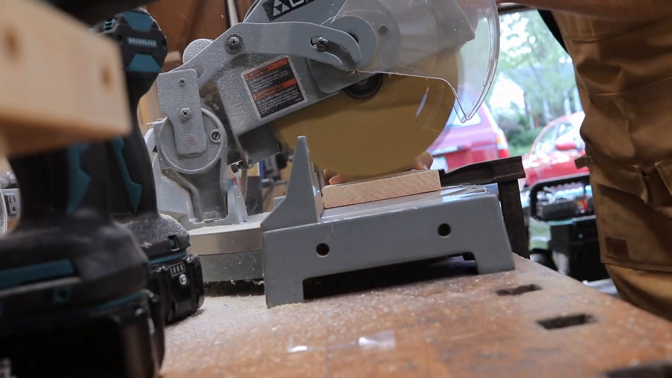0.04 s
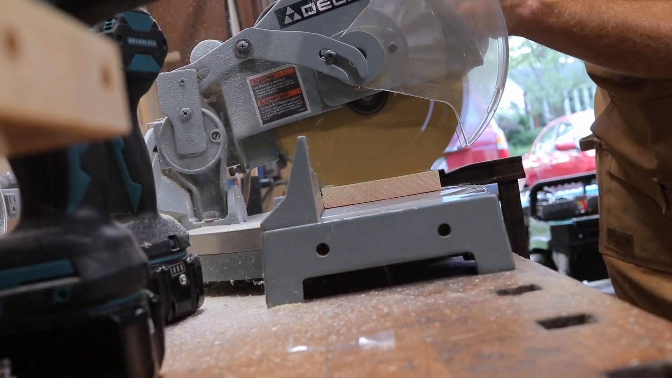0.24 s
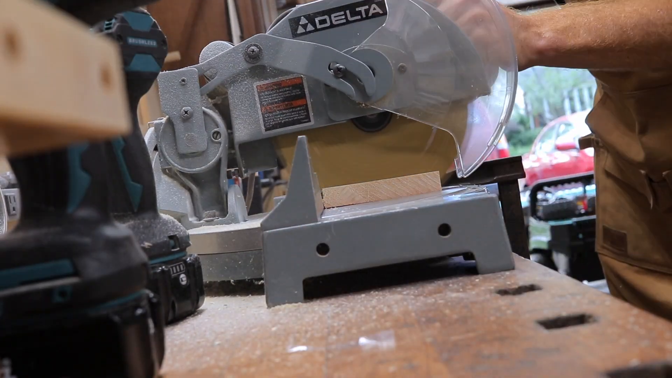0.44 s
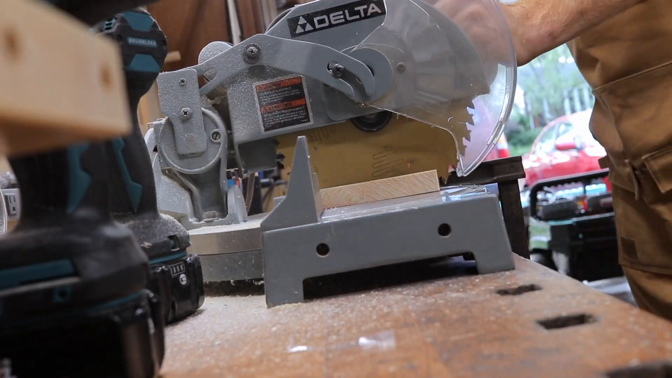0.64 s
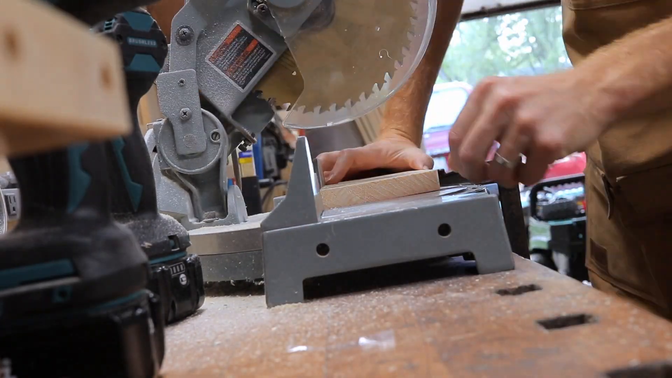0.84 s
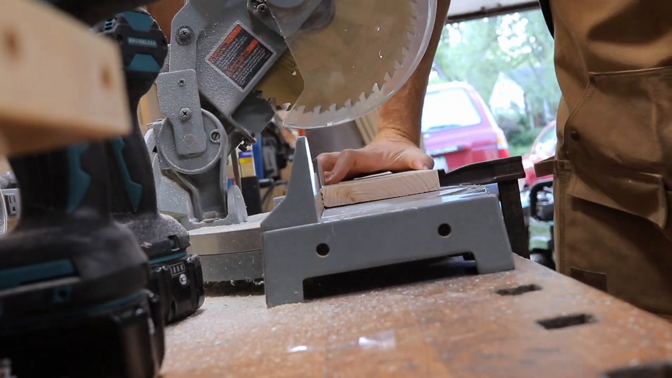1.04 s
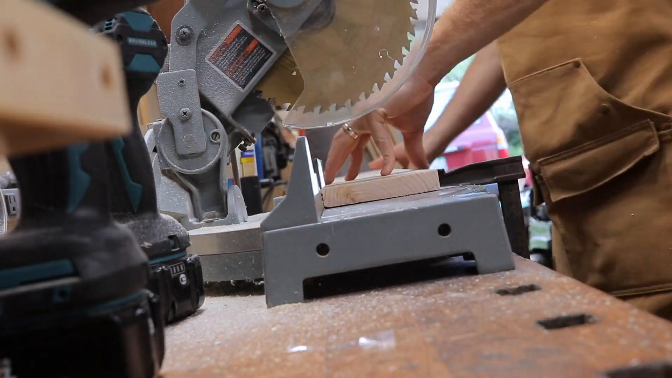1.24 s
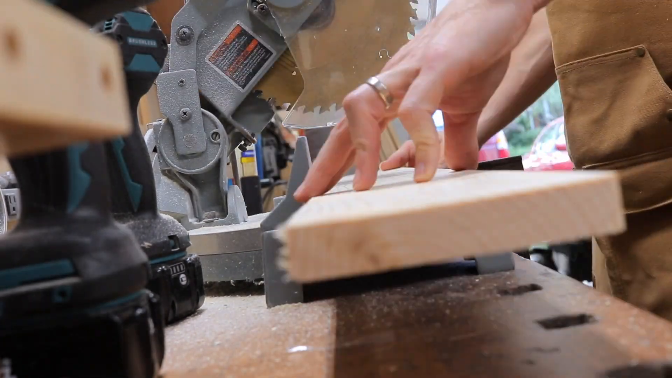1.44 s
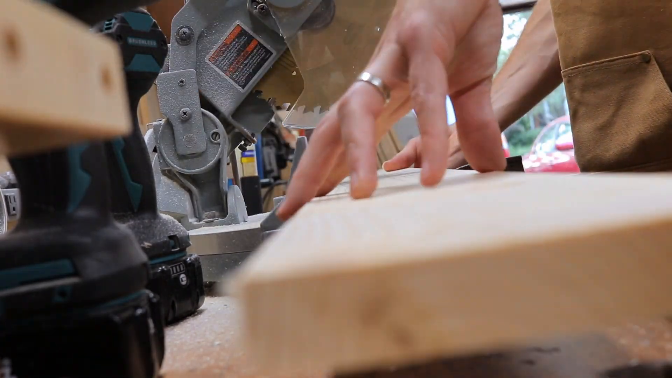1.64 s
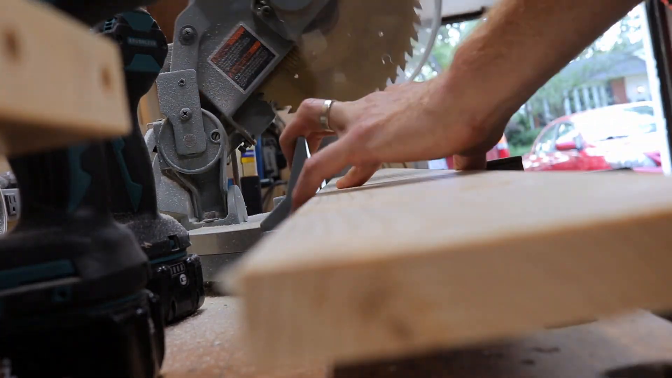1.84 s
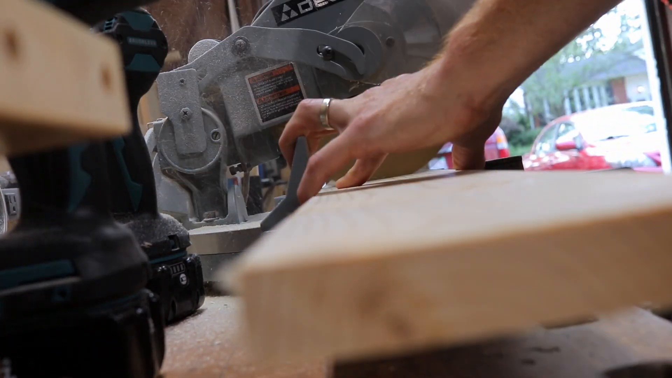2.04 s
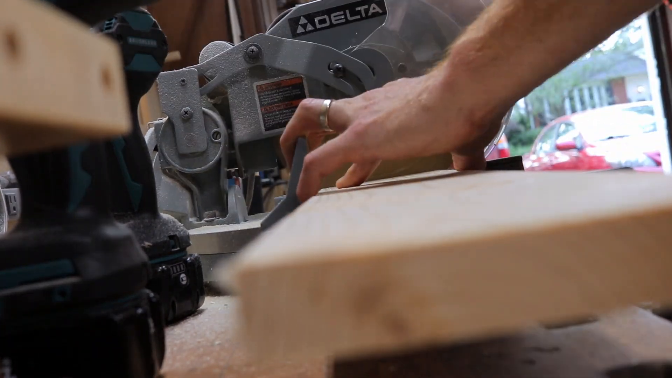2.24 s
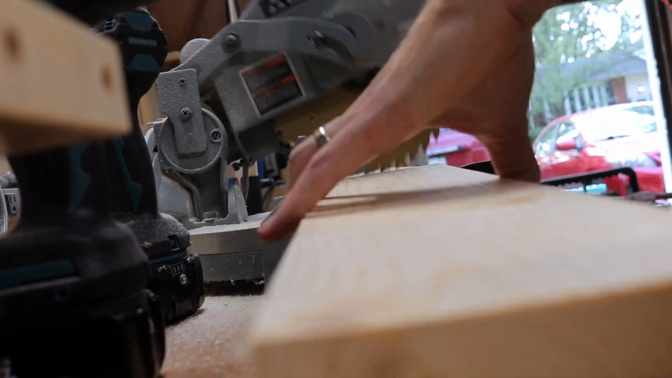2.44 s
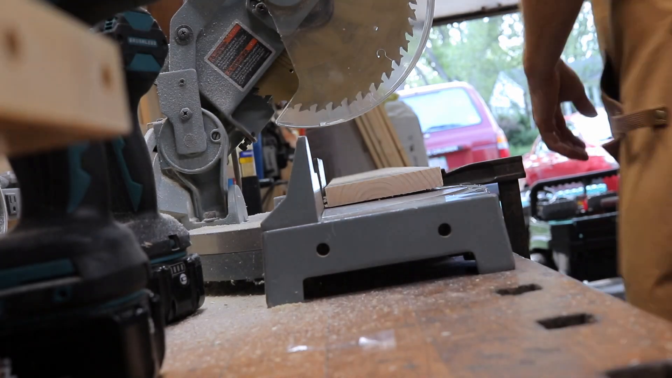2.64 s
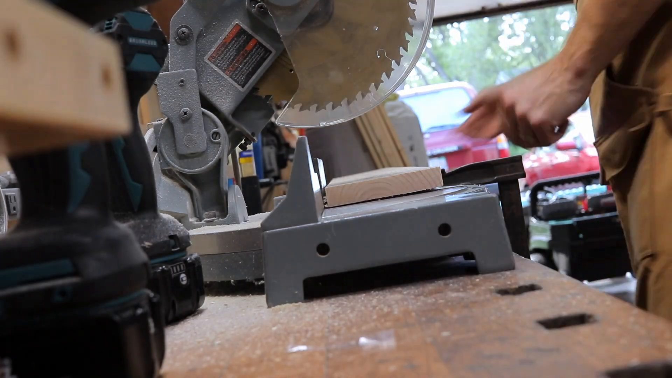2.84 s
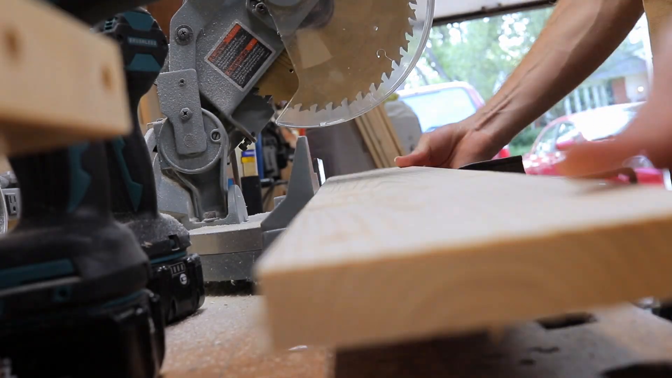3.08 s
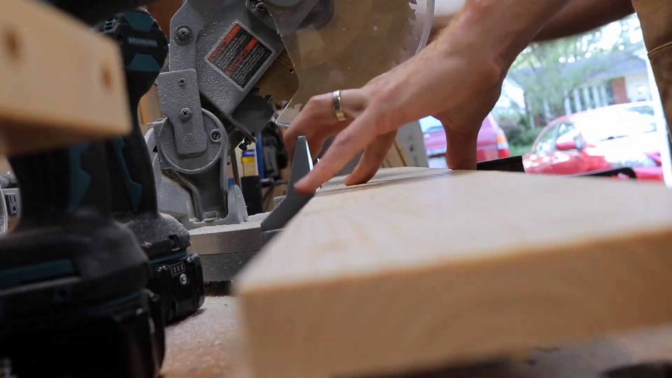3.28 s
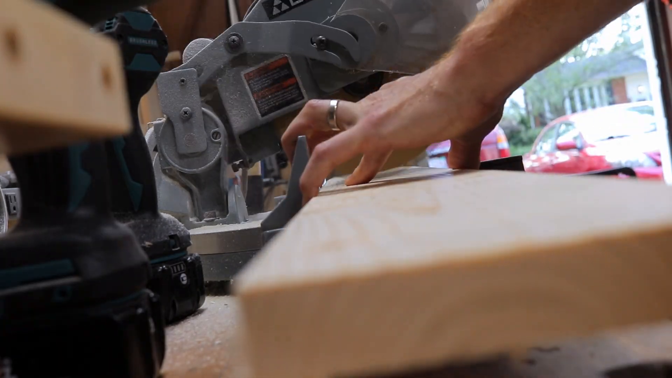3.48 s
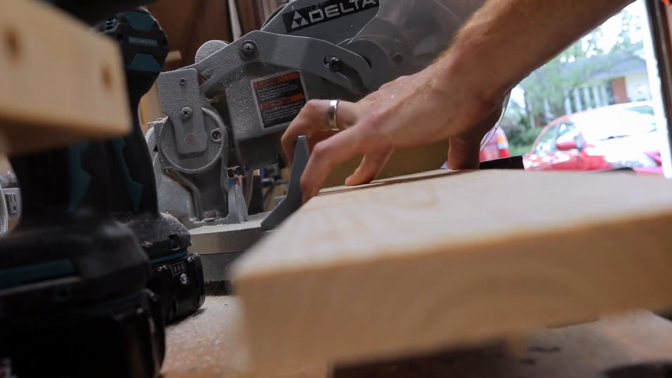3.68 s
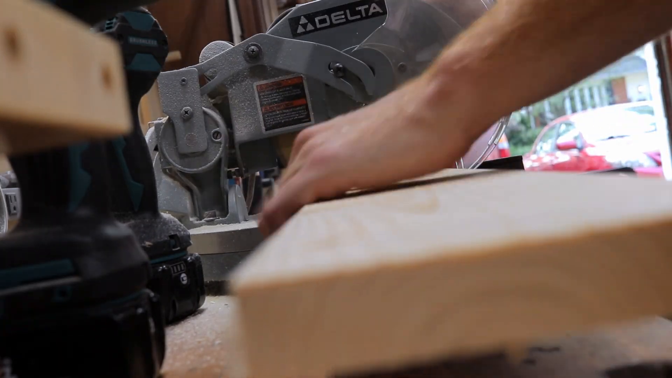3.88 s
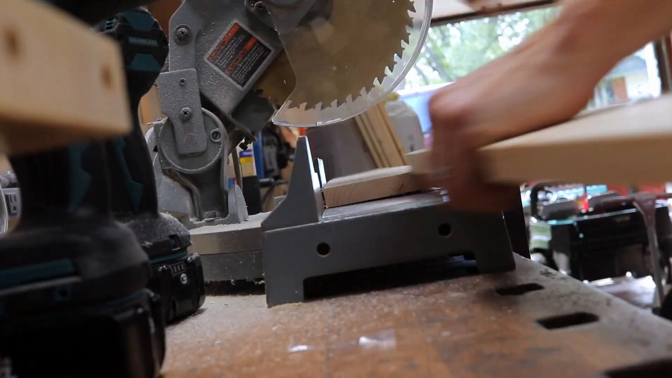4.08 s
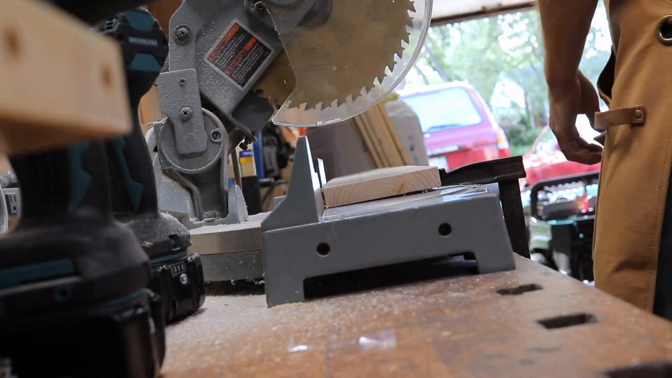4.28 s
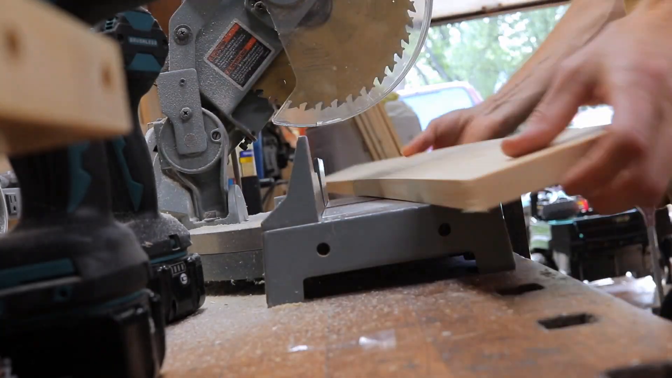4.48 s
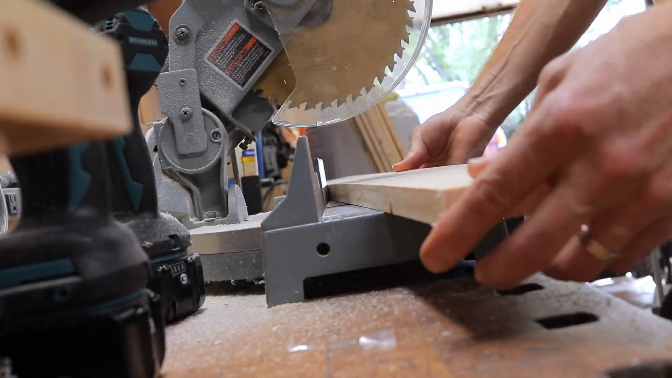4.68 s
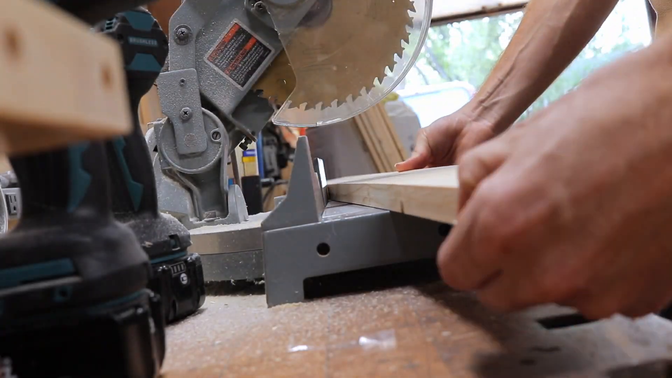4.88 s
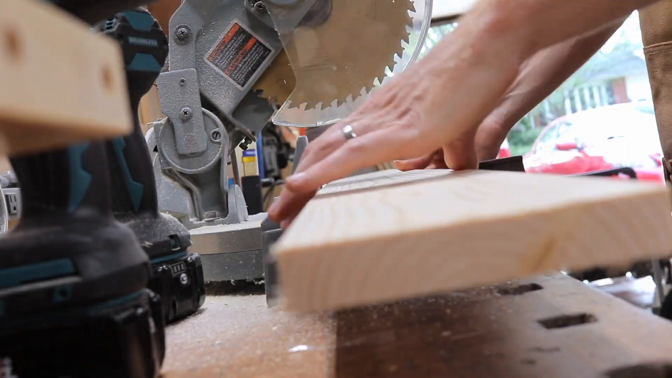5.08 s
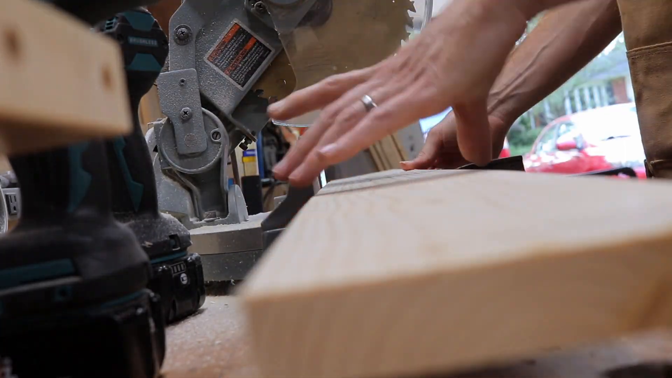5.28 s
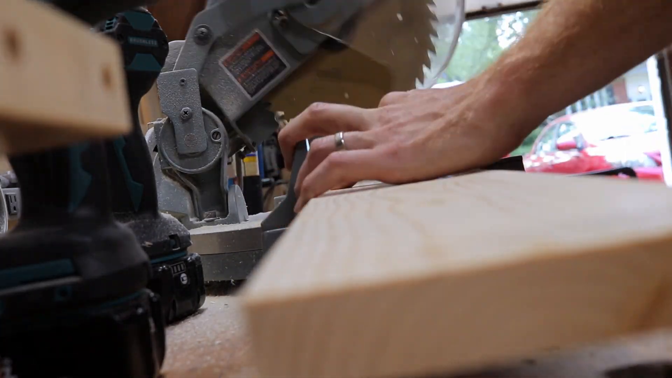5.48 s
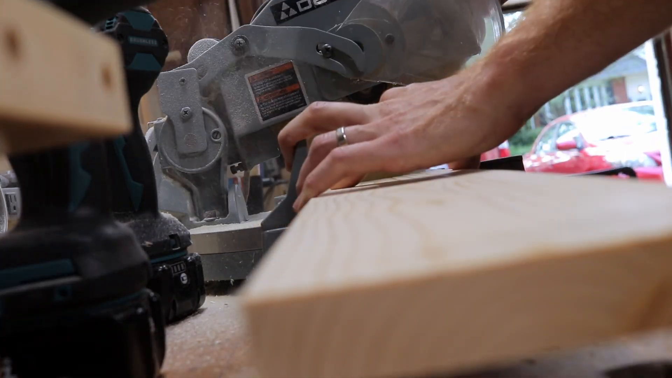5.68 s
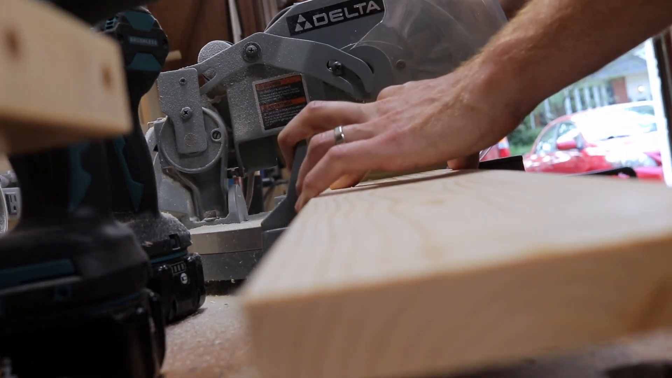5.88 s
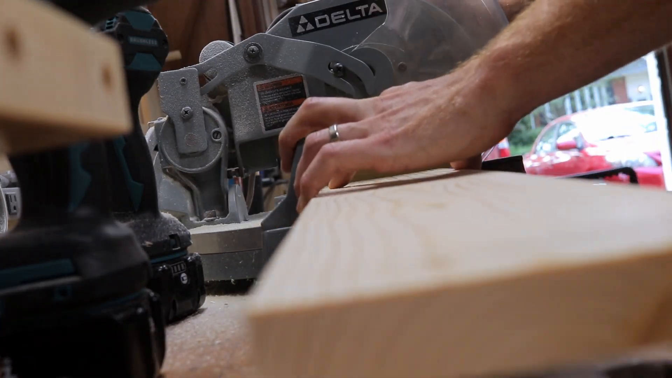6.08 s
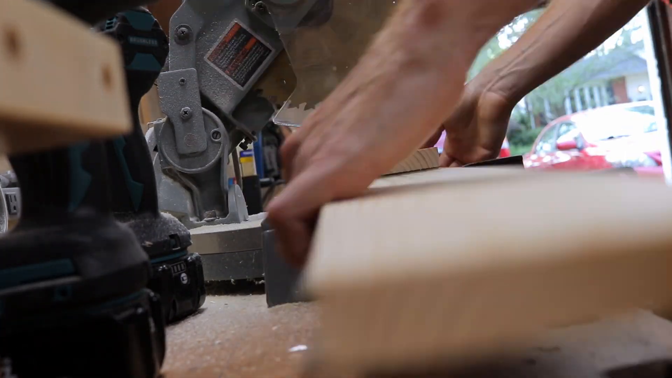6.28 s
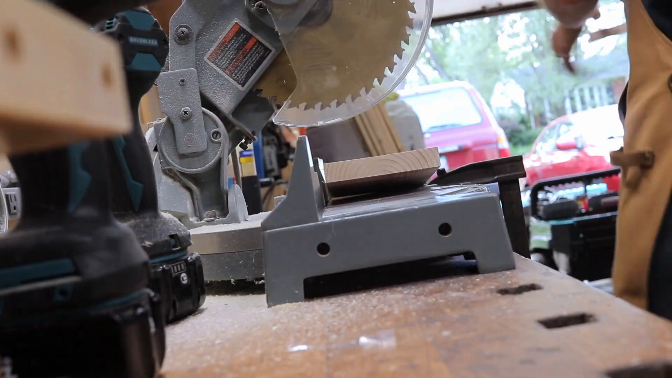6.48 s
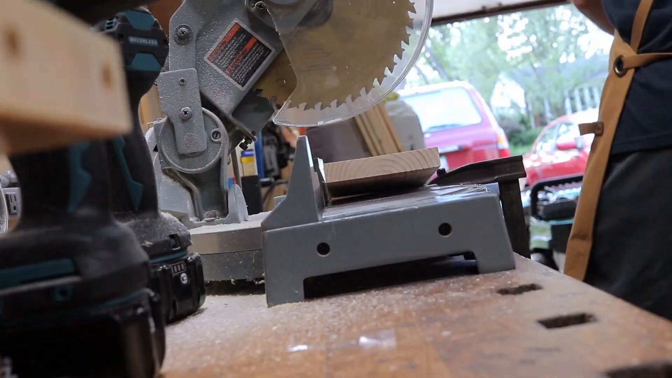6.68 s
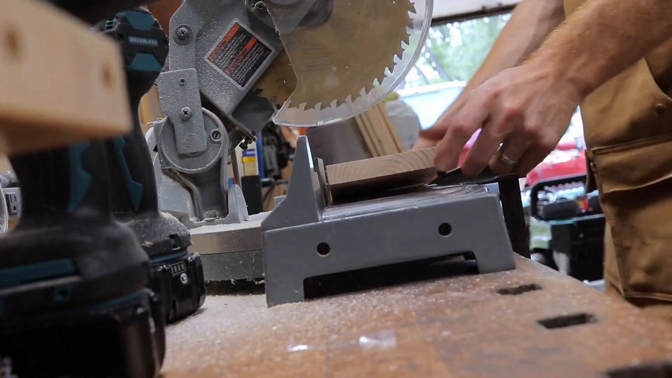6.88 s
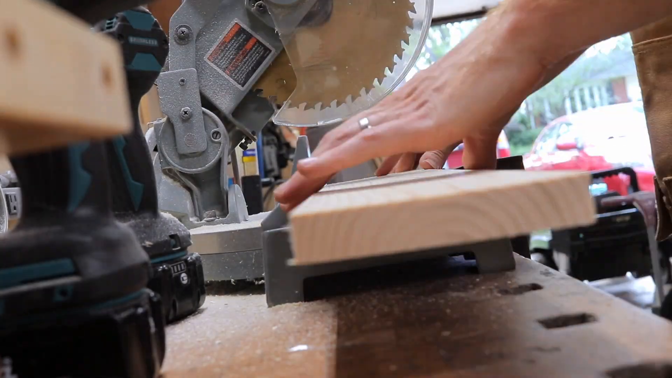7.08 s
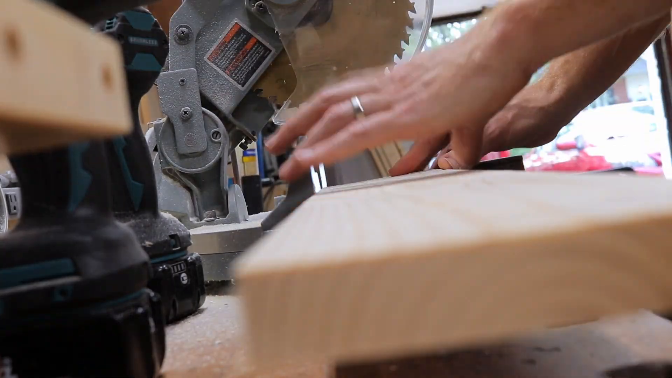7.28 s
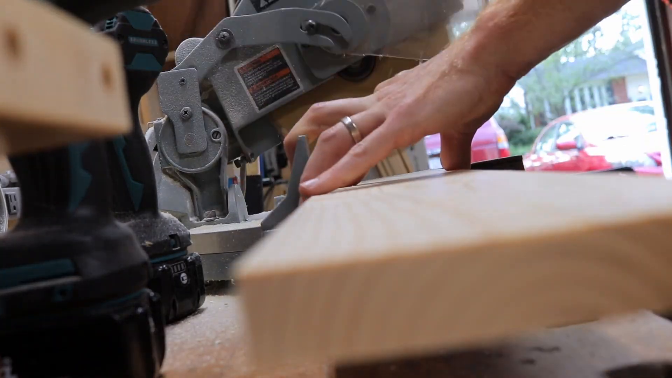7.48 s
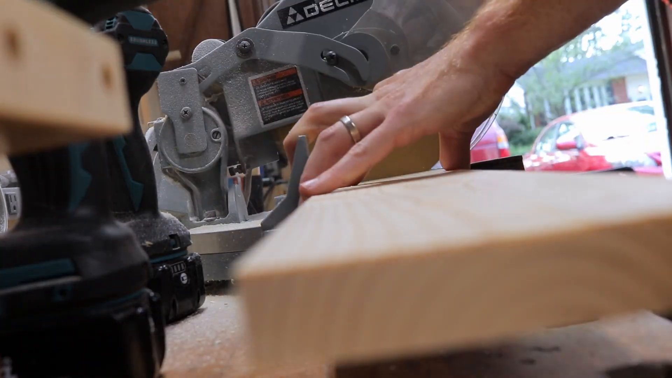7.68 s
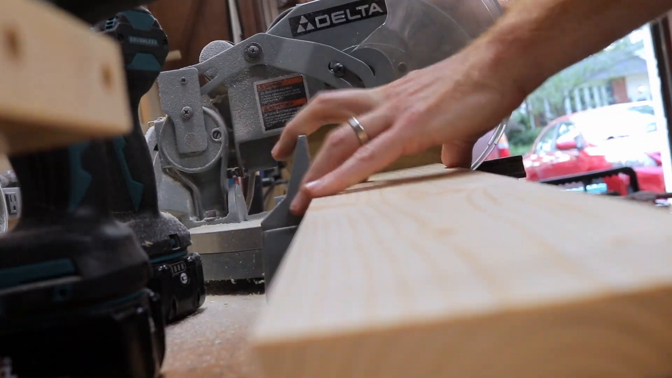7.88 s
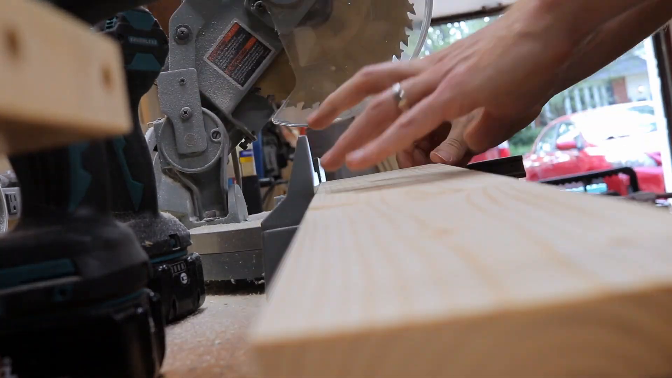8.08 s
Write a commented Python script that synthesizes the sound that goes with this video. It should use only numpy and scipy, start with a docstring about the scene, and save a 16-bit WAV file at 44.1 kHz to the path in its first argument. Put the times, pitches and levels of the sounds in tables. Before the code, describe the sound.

Close, harsh miter saw bursts: five times the motor kicks, the blade screams and sags through wood, then brakes abruptly, wooden boards shuffled in the gaps.

```python
"""Five cuts on a miter saw

In a workshop, close to one microphone, a miter saw makes five quick cuts over quiet air and mains hum.
Each cut is a jolt of noise through frame resonances, then sine partials of the teeth and geared motor that sag
in the wood, over five coloured noises stepped through the stages of the cut until the brake stops the blade.
Low sine thuds and sinking moans join in, and softly knocked boards are short noise bursts between the cuts."""
import sys
import numpy as np
from scipy import signal
from scipy.fft import rfft, irfft
from scipy.io import wavfile
from scipy.ndimage import uniform_filter1d

SR = 44100
rng = np.random.default_rng(int(sys.argv[2]) if len(sys.argv) > 2 else 0)


def generate_wav(sig):
    """Save sig (samples, or channels by samples) to the path in sys.argv[1] as 16-bit PCM at SR."""
    pcm = np.round(np.clip(np.atleast_2d(sig).T, -1, 1) * 32767).astype(np.int16)
    wavfile.write(sys.argv[1], SR, pcm)


N = 358532
T = np.arange(N) / SR


def gain_of(db):
    """Amplitude gain of a level in dB."""
    return 10 ** (np.asarray(db) / 20)


def evened(x):
    """Scales a signal to an RMS of one."""
    return x / np.sqrt(np.mean(x ** 2) + 1e-20)


def read(points, hz):
    """Reads a spectrum in dB along log frequency, 30 dB lower beyond its ends."""
    f, value = np.transpose(points)
    return np.interp(np.log(hz + 1), np.log(f + 1), value, value[0] - 30, value[-1] - 30)


def humps(modes, hz, order=1):
    """Power gain of resonances given as (freq_hz, width_hz, level_db)."""
    return sum(gain_of(2 * db) / (1 + (2 * (hz - f) / width) ** 2) ** order for f, width, db in modes)


def noise(power_of, patchy_db, flicker_db, length=N):
    """Coloured noise in drifting patches, with a flicker that all bands share."""
    frames = length // 128 + 5
    real, imag, patch = rng.standard_normal((frames, 257, 3)).T
    patch = uniform_filter1d(patch, size=5, axis=0)  # across bands
    patch = evened(uniform_filter1d(patch, size=12, axis=1))  # across time
    flicker = evened(uniform_filter1d(rng.standard_normal(frames), size=3))
    bands = (real + 1j * imag) * gain_of(patchy_db * patch + flicker_db * flicker)
    white = signal.istft(bands, nperseg=512, noverlap=384)[1][:length]
    colour = np.sqrt(power_of(np.fft.rfftfreq(length, 1 / SR)))
    return evened(irfft(rfft(white) * colour, length))


def burst(modes, order):
    """A tenth of a second of noise in resonances, levelled on its first moments."""
    def power_of(hz):
        return humps(modes, hz, order) / (1 + (150 / (hz + 1)) ** 6)  # little below 150 Hz
    x = noise(power_of, 0., 0., length=4096)
    return x / np.sqrt(np.mean(x[:1200] ** 2))


def moments(cut):
    """Times of switch on, bite, hardest push, last wood, blade exit, switch off and rest."""
    return cut[0] + np.array([0, *cut[1:7]])


def add(mix, start_s, sound):
    """Lays a sound into the mix at its start time."""
    part = mix[max(round(start_s * SR), 0):][:len(sound)]
    part += sound[:len(part)]


# colour of the air in the shop: freq_hz, density_db
SHOP_AIR = [(15, -52.5), (25, -1), (117, -5.5), (180, -10), (242, -5.5), (623, -12.5), (862, -11.5),
            (961, -5.5), (1070, -15), (1440, -14.5), (2220, -23), (4360, -26), (7490, -37.5), (12200, -50),
            (16000, -56)]
AIR_DB, HUM_DB, HUM_HZ = -61.5, -69.5, 123


def shop():
    """Quiet air of the shop as patchy noise, and a wavering mains hum as two narrow noise bands."""
    air = noise(lambda hz: gain_of(2 * read(SHOP_AIR, hz)), patchy_db=2., flicker_db=.6)
    hum_modes = [(HUM_HZ, 12, 0), (2 * HUM_HZ, 15, -6)]
    hum = noise(lambda hz: humps(hum_modes, hz, order=2), 0., 0.)
    return gain_of(AIR_DB) * air + gain_of(HUM_DB) * hum


# starting jolts of the saw: peak_s, level_db, rise_s, t60_s
JOLTS = [(.007, -14.5, 0.0063, 0.043), (1.92, -12, 0.018, 0.021), (3.433, -13.5, 0.015, 0.043),
         (5.548, -11.5, 0.0024, 0.03), (7.496, -15.5, 0.016, 0.027)]
# resonances of the saw frame: freq_hz, width_hz, level_db
FRAME_MODES = [(245, 60, -13), (710, 70, 0), (860, 70, -2), (1380, 150, -8), (1620, 130, -6),
               (2320, 300, -17), (3250, 500, -17), (4300, 300, -17), (5500, 900, -22), (9000, 4000, -32)]


def jolt(peak_s, level_db, rise_s, t60_s):
    """The motor kicks the frame: a short rattle through its resonances."""
    t = np.arange(4096) / SR - rise_s
    swell_db = 40 * np.minimum(t / rise_s, 0)
    fade_db = -60 * np.maximum(t - .015, 0) / t60_s  # holds for 15 ms first
    return peak_s - rise_s, gain_of(level_db + swell_db + fade_db) * burst(FRAME_MODES, order=1)


# one row a cut. Switch on: start_s; seconds after it: bite_s, push_s (hardest), clear_s (teeth leave the
# wood), exit_s (blade), off_s (switch), rest_s (blade still); before the shares and level curves:
# push_db, labour_db (frame), rasp_db (exit), song_db (teeth), whine_db (motor)
CUTS = [(.003, .102, .325, .407, .473, .495, 1.167, 1.5, 2.5, 8, -3, -1.5),
        (1.93, .095, .235, .275, .35, .372, 1.06, -1, -.4, 2, -4, .4),
        (3.445, .097, .26, .305, .385, .42, 1.105, 1.5, .4, 3, -.6, 1.2),
        (5.57, .09, .27, .295, .445, .478, 1.16, -.5, -.6, 2.2, 1.5, .4),
        (7.51, .094, .23, .298, .352, .39, 1.1, 2.5, -1.2, 8, 2.5, .4)]
# colours of the noises, under power or throughout: freq_hz, density_db
RUMBLE = [(25, -14), (45, -11), (65, -2.5), (90, -6), (118, 6.5), (160, -6.5), (220, -2.5), (290, -31.5)]
DRONE = [(100, -52.5), (170, -23), (204, -27), (248, -16.5), (381, -13.5), (695, 1.5), (842, -1),
         (927, -9.5), (1000, -6), (1090, -7.5), (1150, -14), (1500, -27), (2530, -120)]
ROAR = [(590, -27.5), (1000, 1.5), (1080, -13), (1260, 3.5), (1370, -3.5), (1790, 0.5), (2200, -7.5),
        (2860, -29), (4840, -120)]  # of the guard
GRIND = [(1120, -11), (1900, -10.5), (1940, -9.5), (3210, -2.5), (3480, -5), (4130, -5.5), (4480, -6),
         (5690, -12), (6400, -19.5), (8320, -35), (14100, -120)]
HISS = [(3060, -36), (5200, -3.5), (5930, -9.5), (6160, -8), (6700, -10), (7500, -8.5), (10600, -14),
        (11800, -18.5), (12700, -19.5), (15200, -24), (16000, -14)]
# colours once the power is cut: freq_hz, density_db
BRAKED_DRONE = [(100, -49.5), (170, -13), (493, -2), (583, 3), (678, 4.5), (777, -8), (890, -10),
                (1100, -3.5), (1150, -10), (1500, -48), (2530, -120)]
BRAKED_GRIND = [(1150, -39), (1900, -5), (2060, -6.5), (2600, -6), (3130, -6.5), (3440, -9.5), (3800, -3),
                (5300, -5.5), (5550, -17.5), (6500, -23), (8000, -53)]
# resonances of guard and gearbox, heard under the brake: freq_hz, width_hz, level_db
GUARD_MODES = [(1209, 37, -2.5), (1280.4, 48, 0), (1686, 74, -7.5), (1811, 51, -0.5), (1960, 35, -7.5)]
GEARBOX_MODES = [(2120, 79, -6), (2410, 12, 8.5), (2263, 18, -2.5), (2690, 65, -4.5), (3218, 58, 6),
                 (3700, 20, 5.5), (4210, 200, -2.5), (4720, 37, -7.5), (4820, 34, 4), (5720, 220, 2)]
# level of each noise, level_db at: kick, run-up, bite, push, last wood, clear, switch off, brake on,
# brake biting, rest, and three steps of dying away
RUMBLE_DB = [-45.5, -38, -51.5, -44, -46.5, -49, -55.5, -63, -64.5, -68.5, -58, -80, -71]
DRONE_DB = [-17.5, -27.5, -26, -24, -26.5, -23.5, -27, -33.5, -34, -33, -42.5, -62.5, -78]
GUARD_DB = [-34.5, -40, -35, -25, -30, -29, -28, -27.5, -25.5, -25, -47, -62.5, -72]
GRIND_DB = [-18.5, -24.5, -23.5, -22.5, -21, -20, -23, -25, -25.5, -26.5, -44.5, -60, -75.5]
HISS_DB = [-37, -37.5, -28, -24.5, -24.5, -28, -31, -36, -35.5, -36.5, -55, -68.5, -88]
# one value a noise, in the order above: settle_s under the brake, then the share of each dB change it follows
BRAKE_S = [.06, .12, 0.15, 0.032, 0.029]
PUSH_SHARE = [0.89, 0.52, 0.51, .6, 0.71]
LABOUR_SHARE = [0.73, 0.59, 0.7, 0.18, .1]
RASP_SHARE = [0.101, 0.199, .3, .6, 1.1]
# steps of dying away: after_rest_s
DYING_S = [.075, 0.17, .28]
RUN_UP_S, CLEAR_S, BITING_S = 0.0085, 0.015, 0.35  # after switch on; after last wood; after switch off
RASP_S = .013  # half length of the rasp
BUZZ_DB = -50  # the mains shaking the powered windings


def tint(points, modes=(), base=1):
    """Patchy noise of one colour, with resonances on top."""
    def power_of(hz):
        return gain_of(2 * read(points, hz)) * (base + humps(modes, hz))
    return noise(power_of, patchy_db=1.5, flicker_db=0.04)


def guard_ring():
    """The guard ringing under the brake: its resonances, falling 3.9 dB an octave away from 1500 Hz."""
    def power_of(hz):
        octaves = abs(np.log2((hz + 1) / 1500))
        return humps(GUARD_MODES, hz) * gain_of(-2 * 3.9 * octaves)
    return noise(power_of, patchy_db=0.21, flicker_db=0.35)


def duller(x, above_hz, db, slack):
    """Lowers the upper part while the brake is slack; it comes up again as the brake bites harder."""
    highpass = signal.butter(4, above_hz, "high", fs=SR, output="sos")
    upper = signal.sosfiltfilt(highpass, x)
    return x - (1 - gain_of(db * slack)) * upper


def machine():
    """Five noises of the running saw step through each cut; three change colour once the power is cut."""
    powered, slack = np.zeros((2, N))
    for cut in CUTS:
        start, *_, off, _ = moments(cut)
        powered += np.interp(T, [start - .08, start - .03, off, off + 0.086], [0, 1, 1, 0])
        slack += np.interp(T, off + np.array([-.1, 0, 0.19, 0.33]), [0, 1, 1, 0])
    driven, braked = np.sqrt(powered), np.sqrt(1 - powered)  # crossfade of equal power

    slow_guard = duller(guard_ring(), 1400, -1.5, slack)
    slow_grind = duller(tint(BRAKED_GRIND, GEARBOX_MODES, base=0.6), 4000, -8.0, slack)
    layers = [tint(RUMBLE),
              driven * tint(DRONE) + braked * tint(BRAKED_DRONE),
              driven * tint(ROAR) + braked * slow_guard,
              driven * tint(GRIND) + braked * slow_grind,
              tint(HISS)]
    winding_modes = [(122, 5.5, -2), (246, 10, 1.5)]
    buzz = gain_of(BUZZ_DB) * powered * noise(lambda hz: humps(winding_modes, hz, order=2), 0., 0.)

    out = np.zeros(N)
    for cut in CUTS:
        start, bite, push, clear, leave, off, rest = moments(cut)
        push_db, labour_db, rasp_db = cut[7:10]
        fade_in = np.clip((T - start) / .014 + 1, 0, 1) ** 2
        fade_out = np.clip((rest + DYING_S[-1] - T) / .05 + 1, 0, 1)
        gate = fade_in * fade_out
        pushed_db = push_db * np.interp(T, [bite, push, clear, clear + CLEAR_S], [0, 1, 1, 0])
        laboured_db = labour_db * np.interp(T, [start, bite, off, off + BITING_S], [0, 1, 1, 0])
        rasped_db = rasp_db * np.exp(-((T - leave) / RASP_S) ** 2 / 2)
        out += gate * buzz
        for k, stages_db in enumerate((RUMBLE_DB, DRONE_DB, GUARD_DB, GRIND_DB, HISS_DB)):
            stages_s = [start, start + RUN_UP_S, bite, push, clear, clear + CLEAR_S,
                        off, off + BRAKE_S[k], off + BITING_S, rest, *(rest + np.array(DYING_S))]
            level_db = np.interp(T, stages_s, stages_db)
            level_db += PUSH_SHARE[k] * pushed_db
            level_db += LABOUR_SHARE[k] * laboured_db
            level_db += RASP_SHARE[k] * rasped_db
            out += gate * gain_of(level_db) * layers[k]
    return out


# one list a powered spin, up to speed, sagging in the wood, free again: time_s, tooth_rate_hz
SPINS = [
    [(.035, 2350), (.105, 2880), (.224, 2620), (.325, 2010), (.361, 2120), (.453, 2780), (.5, 2900)],
    [(1.95, 2500), (2.025, 2880), (2.093, 2510), (2.165, 2330), (2.201, 2430), (2.245, 2740), (2.31, 2910)],
    [(3.46, 2450), (3.542, 2860), (3.624, 2350), (3.664, 2170), (3.705, 2120), (3.8, 2700), (3.87, 2860)],
    [(5.58, 2400), (5.62, 2650), (5.66, 2820), (5.8, 2460), (5.85, 2400), (5.956, 2800), (6.05, 3020)],
    [(7.53, 2450), (7.604, 2860), (7.678, 2470), (7.71, 2340), (7.74, 2305), (7.788, 2420), (7.861, 2810),
     (7.9, 2930)],
]
# partials of the teeth: multiple of the tooth rate, level_db
TEETH = [(1, 1.5), (2, -3), (2.5, -17.5), (3, 2), (3.5, -9), (4, -6.5), (5, -9), (5.5, -12), (6, -17.5)]
# partials of the motor: multiple of the motor shaft rate, level_db
MOTOR = [(1, -12), (9, -1.5), (12, -4.5), (18, -2.5), (24, -13.5), (36, -12.5)]
# partial of every other tooth: multiple of the tooth rate, level_db
WOBBLE = [(.5, 0.5)]
# blade modes that a passing partial wakes: freq_hz, width_hz, lift_db
BLADE_MODES = [(1220, 150, 0.5), (3260, 310, 12), (4130, 250, 10), (4600, 300, 6.5), (5530, 360, 11),
               (5820, 200, 13.5), (6700, 140, 1.5), (7100, 480, 5.5), (8600, 200, 5.5)]
# level of tooth song and motor whine, level_db at: run-up, bite, sinking in, push, last wood, clear, switch off
SONG_DB = [-50, -39.5, -35, -28.5, -33.5, -44.5, -46.5]
WHINE_DB = [-36, -33, -32, -34.5, -33.5, -32, -32.5]
SHAFT_TURNS = .1227  # motor turns for each passing tooth
OFF_MODE_POWER = .55  # power of a partial between the blade modes
SINKING, EASING_S = .65, .03  # share of the way from bite to push; time after the last wood
# the blade wobbles once: time and level of the peak, and how fast it swells and fades
WOBBLE_S, WOBBLE_DB, WOBBLE_DB_PER_S = 3.61, -18.5, 251.5


def spin(speed, cut):
    """Partials of the tooth rate and of the geared motor, wavering, louder where they cross a blade mode."""
    t = np.arange(speed[0][0], speed[-1][0], 1 / SR)
    tooth_hz = uniform_filter1d(np.interp(t, *np.transpose(speed)), size=900)
    _, bite, push, clear, _, off, _ = moments(cut)
    song_db, whine_db = cut[10:]
    stages_s = [t[0], bite, bite + SINKING * (push - bite), push, clear, clear + EASING_S, off]
    teeth_db = np.interp(t, stages_s, SONG_DB) + song_db
    motor_db = np.interp(t, stages_s, WHINE_DB) + whine_db
    wobble_db = WOBBLE_DB - WOBBLE_DB_PER_S * abs(t - WOBBLE_S)
    # the brushes chatter, so the whine is rougher: level, partials, base rate, pitch waver, share of noise
    families = ((teeth_db, TEETH, tooth_hz, .004, .45),
                (motor_db, MOTOR, SHAFT_TURNS * tooth_hz, .011, .65),
                (wobble_db, WOBBLE, tooth_hz, .004, .2))
    out = np.zeros(len(t))
    for level_db, partials, base_hz, waver, rough in families:
        for multiple, partial_db in partials:
            shake, beat = (evened(uniform_filter1d(v, size=250)) for v in rng.standard_normal((2, len(t))))
            hz = multiple * base_hz * (1 + waver * shake)
            strength = np.sqrt(1 - rough ** 2) + rough * beat
            strength *= np.sqrt(humps(BLADE_MODES, hz) + OFF_MODE_POWER)
            tone = np.sin(2 * np.pi * np.cumsum(hz) / SR)
            out += strength * gain_of(level_db + partial_db) * tone
    return t[0], out * signal.windows.tukey(len(t), .05)


# decay of the workshop's echo: freq_hz, t60_s
ROOM = [(200, 0.31), (1000, 0.26), (4000, 0.46), (12000, 1)]


def room(x):
    """Echo of the shop: sparse taps of random sign, each band dying at its own speed."""
    taps = np.zeros(SR // 2)
    at = np.arange(300, len(taps) - 20, 20)
    taps[at + rng.integers(0, 20, len(at))] = rng.choice([-1., 1.], len(at))
    hz, t, bands = signal.stft(taps, SR, nperseg=256)
    t60_s = np.interp(hz, *np.transpose(ROOM))
    tail = signal.istft(bands * gain_of(-60 * t / t60_s[:, None]), SR, nperseg=256)[1]
    return signal.fftconvolve(x, tail / np.linalg.norm(tail))[:N]


# the saw head lands on its stop: start_s, level_db, pitch_hz
THUDS = [(.29, -55, 66), (.43, -44, 58.8), (2.249, -40, 62), (3.8, -39, 62.3), (4.11, -51, 59.7),
         (5.97, -44, 66.3), (7.8, -41, 62)]


def thud(start_s, level_db, pitch_hz):
    """A soft, low shove into the bench: a sine with a 20 ms rise and a long fade."""
    t = np.arange(6000) / SR
    envelope = gain_of(level_db - 60 * t / 0.35) * np.minimum(t / 0.02, 1)
    return start_s, envelope * np.sin(2 * np.pi * pitch_hz * t)


# last moans of the braked motor, timed where they have sunk to 200 Hz: time_s, level_db
MOANS = [(1.298, -53.5), (3.131, -51.5), (4.671, -55), (6.849, -54.5)]


def moan(time_s, level_db):
    """A beating tone that sinks as the rotor loses speed, and dies with it."""
    t = np.arange(-.2, .03, 1 / SR)
    turns = np.cumsum(200 * np.exp(-t / 0.13)) / SR
    beat = 1 + 0.36 * evened(uniform_filter1d(rng.standard_normal(len(t)), size=600))
    tone = np.sin(2 * np.pi * turns) * signal.windows.tukey(len(t), .4)
    return time_s + t[0], gain_of(level_db - 60. * t) * beat * tone


# boards set down and nudged, levels before the mix of parts: time_s, level_db, pitch_hz,
# tick_db and thud_db (both relative to level_db)
KNOCKS = [(1.479, -50.5, 439, -21, -15), (1.498, -46, 312, -26, -18), (1.68, -40, 234, -30, -6),
          (1.756, -41, 263, -26, -21), (3.249, -51.5, 877, -13.5, -3.5), (4.945, -42.5, 285, -9, -24),
          (5.064, -38, 492, -14, -22), (5.255, -46, 258, -20.5, -6), (5.294, -47.5, 261, -25, -5),
          (5.415, -41.5, 830, -26, -26), (5.507, -50, 680, -5, -8), (6.994, -33, 518, -13.5, -21.5),
          (7.058, -38.5, 546, -21, -18), (7.098, -50, 830, -3, -13.5), (7.158, -54, 613, 3, -15),
          (7.209, -51, 382, -7, -13), (7.304, -44.5, 240, -27, -5), (7.355, -60, 961, 5, -13.5)]
# resonances of a board: multiple of the pitch, width_hz, level_db
BOARD_MODES = [(1, 140, 2), (.55, 88, 0.5), (1.9, 200, -10), (3.3, 810, -17)]


def knock(time_s, level_db, pitch_hz, tick_db, thud_db):
    """A soft, scraping blow through the board's resonances, with a short scuff and a low push into the bench."""
    t = np.arange(4096) / SR
    ring = burst([(k * pitch_hz, width, db) for k, width, db in BOARD_MODES], order=2)
    scuff = gain_of(tick_db) * burst([(2200, 5000, 0)], order=2)
    push = np.sin(2 * np.pi * 85 * t) * gain_of(thud_db - 60 * t / .1)
    fade = gain_of(-60 * (t / 0.043) ** 2)
    blow = (0.5 * ring + 0.88 * scuff) * fade + 1.6 * push
    return time_s - .003, gain_of(level_db) * blow * np.minimum(t / .008, 1)


def scene():
    """Tones, jolts and bench blows get the room's echo; the running noises and shop air are left dry."""
    saw, bench = np.zeros((2, N))
    for play, table in ((spin, zip(SPINS, CUTS)), (jolt, JOLTS), (moan, MOANS)):
        for row in table:
            add(saw, *play(*row))
    for play, table in ((thud, THUDS), (knock, KNOCKS)):
        for row in table:
            add(bench, *play(*row))
    echo = room(gain_of(-11.0) * saw + gain_of(-9) * bench)
    mono = saw + bench + echo + machine() + shop()
    return np.array([mono, mono])


EDGE_HZ = 15750  # upper band limit


def record(dry):
    """A steep lowpass limits the band of both channels."""
    lowpass = signal.firwin(1023, EDGE_HZ, window=("kaiser", 9), fs=SR)
    return signal.oaconvolve(dry, lowpass[None], "same")


dry = scene()
out = record(dry)
generate_wav(out)
```